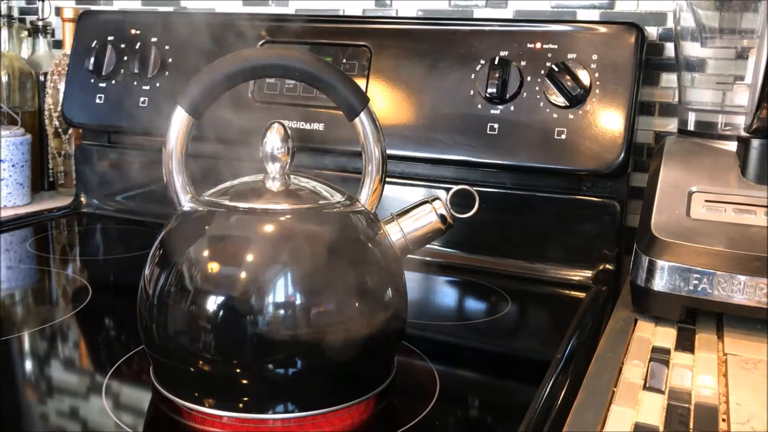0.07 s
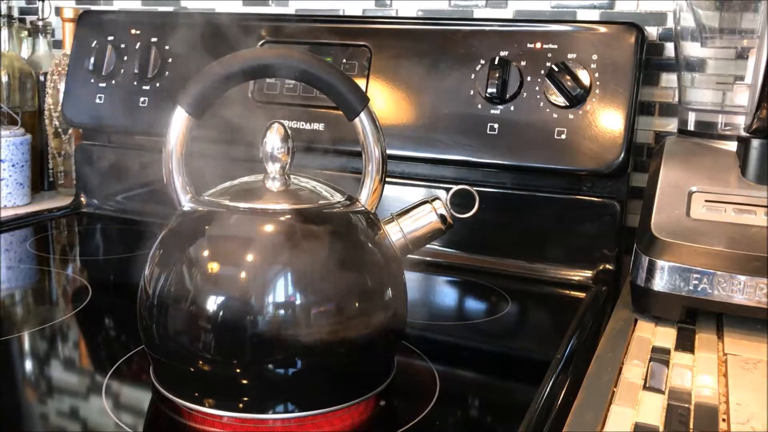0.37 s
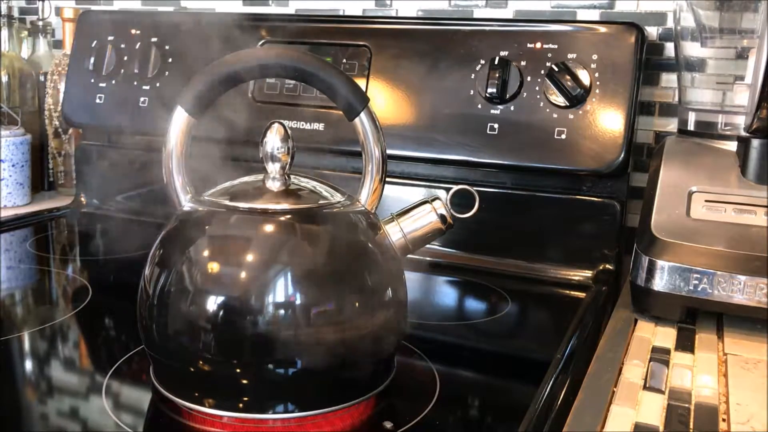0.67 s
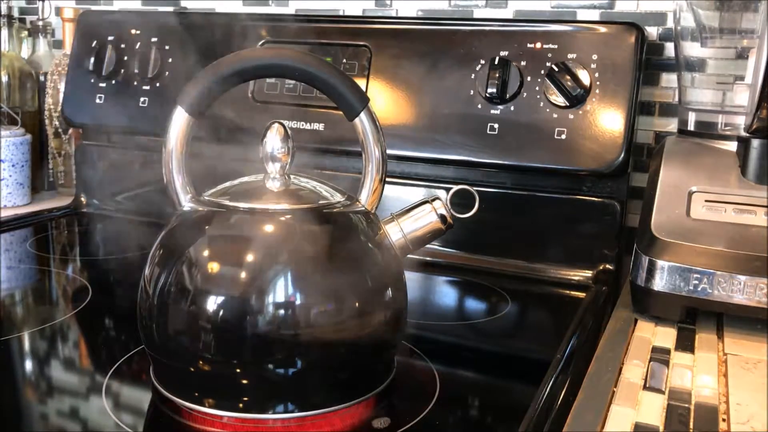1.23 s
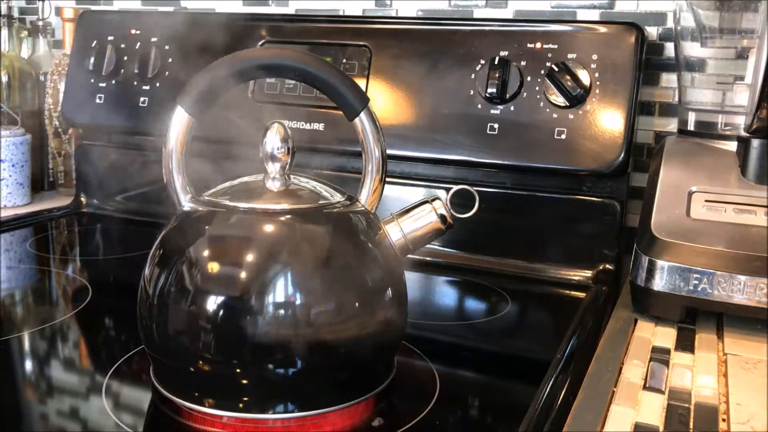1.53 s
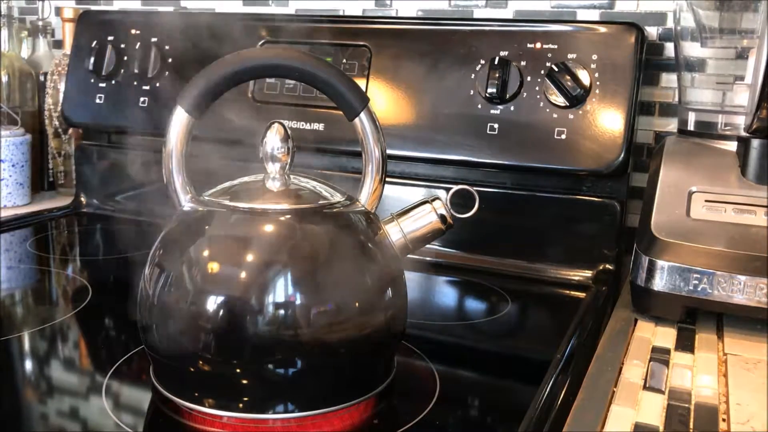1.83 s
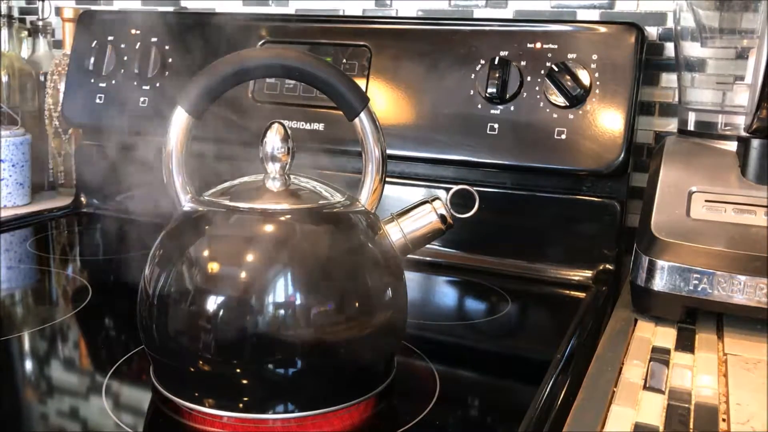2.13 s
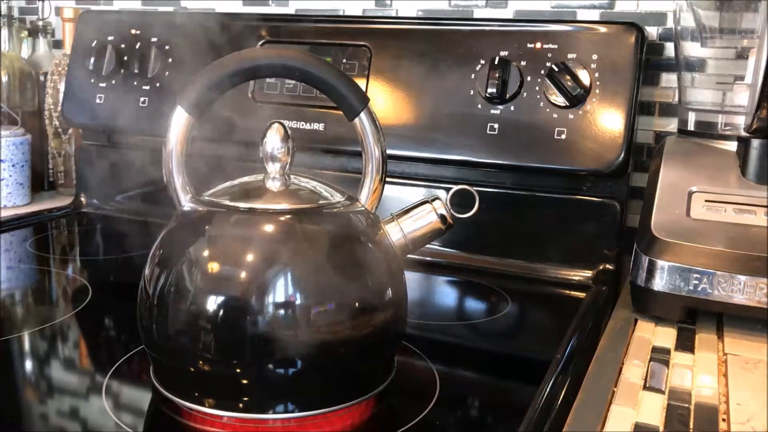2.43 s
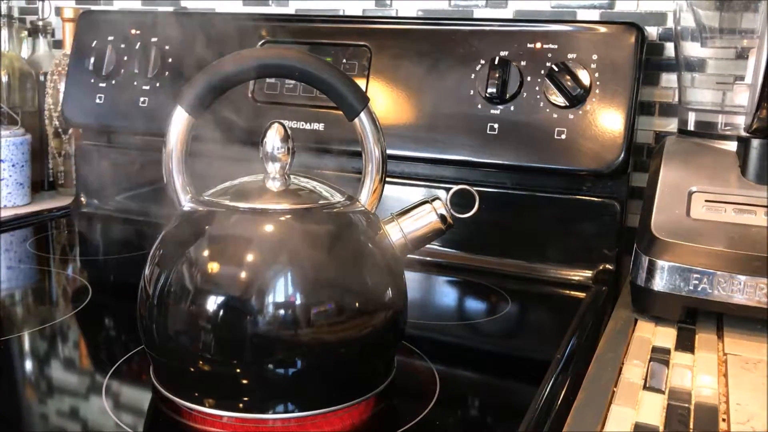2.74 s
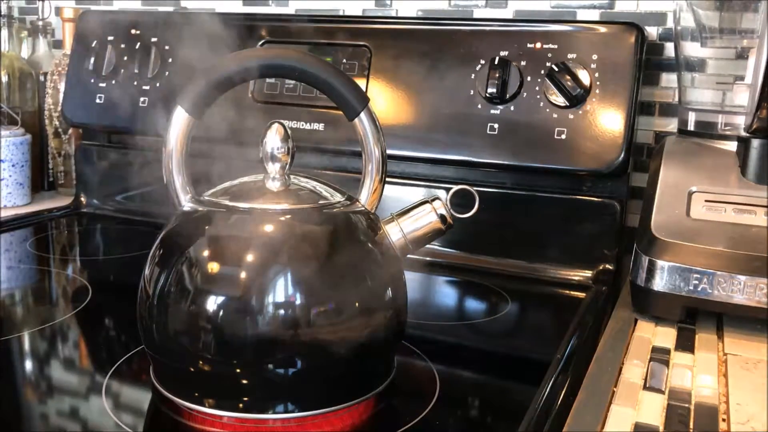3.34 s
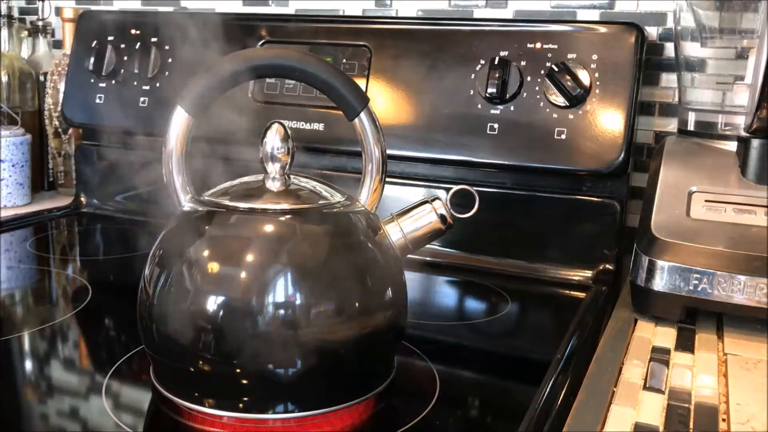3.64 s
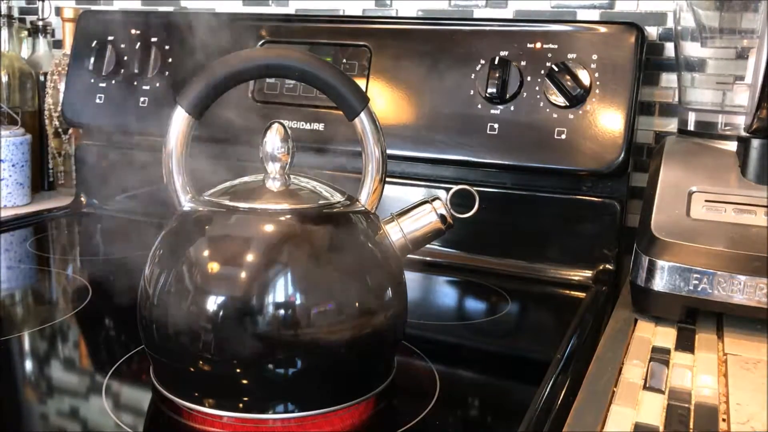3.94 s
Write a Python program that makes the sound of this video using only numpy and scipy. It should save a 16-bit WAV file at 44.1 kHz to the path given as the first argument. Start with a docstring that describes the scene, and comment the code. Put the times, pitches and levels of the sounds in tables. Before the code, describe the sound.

High, wavering kettle whistle with steam hiss, faint boiling and water briefly spitting on the burner.

```python
"""Whistling kettle on a stove

A kettle at full boil whistles in a kitchen. Its steam jet sings a shrill tone that wanders with
the pressure and flutters by interference with its own echoes. Turbulent steam hisses through the
spout over the rumble of the water; a splash sizzles away on the hot plate and single droplets pop."""
import sys
import numpy as np
from scipy import signal
from scipy.fft import rfft, irfft
from scipy.io import wavfile
from scipy.ndimage import uniform_filter1d

SR = 44100
rng = np.random.default_rng(int(sys.argv[2]) if len(sys.argv) > 2 else 0)


def transcribe(signal):
    """Save signal, clipped to [-1, 1], as a 16-bit WAV file at the path in sys.argv[1]."""
    frames = np.atleast_2d(signal).T
    limited = np.clip(frames, -1, 1)
    pcm = np.round(limited * 32767).astype(np.int16)
    wavfile.write(sys.argv[1], SR, pcm)


N = 176400
TIME = np.arange(N) / SR
RUN_IN = SR // 2   # samples in which the reverberation builds up


def from_db(db):
    """Amplitude grows tenfold for every 20 dB."""
    return 10 ** (np.asarray(db) / 20)


def rms_one(x):
    """Division by the root mean square gives unit power."""
    return x / np.sqrt(np.mean(x ** 2) + 1e-20)


def in_time(rows):
    """Linear interpolation joins (seconds, value) rows into a curve."""
    return np.interp(TIME, *np.transpose(rows))


def drift(rate_hz):
    """Low-passed noise fluctuates at unit power, mostly slower than rate_hz."""
    pole = np.exp(-2 * np.pi * rate_hz / SR)
    smooth = signal.lfilter([1], [1, -2 * pole, pole * pole], rng.standard_normal(N + SR))
    return rms_one(smooth[SR:])


def coloured(x, spectrum):
    """Spectral shaping by a (Hz, dB) curve colours a sound; the result has unit power."""
    hz, db = np.transpose(spectrum)
    bin_hz = np.maximum(np.fft.rfftfreq(N, 1 / SR), 1)
    gain = from_db(np.interp(np.log(bin_hz), np.log(hz), db))
    return rms_one(irfft(rfft(x) * gain, N))


def resonate(x, hz, width_hz):
    """A damped resonator passes a band around its natural frequency; the result has unit power."""
    radius = np.exp(-np.pi * width_hz / SR)
    feedback = [1, -2 * radius * np.cos(2 * np.pi * hz / SR), radius * radius]
    return rms_one(signal.lfilter([1, 0, -1], feedback, x))


def run_in(x):
    """Reverberation takes time to build, so a mirrored lead-in sets the room ringing beforehand."""
    return np.pad(x, (RUN_IN, 0), "reflect")


def kitchen(x, echo_db=-3, t60_s=0.39, gap_s=0.0045):
    """Diffuse reflections follow the direct sound and decay exponentially; x loses its run-in."""
    age = TIME[:RUN_IN + 1]
    response = rng.standard_normal(len(age)) * from_db(-60 * age / t60_s) * (age > gap_s)
    response *= from_db(echo_db) / np.sqrt(np.sum(response ** 2))
    response[0] += 1   # direct sound
    return signal.fftconvolve(x, response, "valid")


def echo_flutter(tone, window_s=0.045, power_floor=0.5):
    """A wavering tone interferes with its echoes; swells slower than the window are partly levelled."""
    beating = rms_one(kitchen(tone, echo_db=-1.5))
    slow_power = uniform_filter1d(beating ** 2, int(window_s * SR))
    return rms_one(beating / np.sqrt(slow_power + power_floor))


# The whistle's pitch rises with steam pressure. Each row: time in seconds, frequency in Hz.
WHISTLE_PITCH = [(0.0, 4261), (0.045, 4189), (0.11, 4295), (0.21, 4300), (0.31, 4232), (0.34, 4265),
                 (0.38, 4213), (0.41, 4276), (0.5, 4248), (0.56, 4292), (0.66, 4190), (0.685, 4294),
                 (0.8, 4310), (0.85, 4259), (0.91, 4300), (0.97, 4410), (1.08, 4350), (1.15, 4374),
                 (1.22, 4420), (1.35, 4415), (1.39, 4370), (1.44, 4410), (1.62, 4345), (1.75, 4396),
                 (1.85, 4480), (1.91, 4432), (2.0, 4561), (2.18, 4375), (2.25, 4345), (2.29, 4437),
                 (2.35, 4414), (2.49, 4472), (2.62, 4434), (2.68, 4490), (2.76, 4440), (2.81, 4431),
                 (2.87, 4320), (2.92, 4320), (2.97, 4436), (3.04, 4373), (3.13, 4460), (3.36, 4391),
                 (3.46, 4450), (3.545, 4513), (3.58, 4425), (3.66, 4420), (3.73, 4360), (3.82, 4368),
                 (3.9, 4400), (4.0, 4440)]
# The fundamental swells and fades unevenly. Each row: time in seconds, relative level in dB.
WHISTLE_LEVEL = [(0.0, -25), (0.12, -34), (0.17, -28), (0.21, -36), (0.24, -28), (0.72, -31.5), (0.78, -39),
                 (0.83, -26), (0.9, -37), (0.91, -31), (1.19, -32.5), (1.22, -21), (1.26, -32.5),
                 (1.3, -25), (1.32, -40.5), (1.35, -19), (1.37, -38.5), (1.45, -24), (1.47, -39.5),
                 (1.54, -27.5), (1.63, -33.5), (1.69, -25), (1.76, -34), (1.8, -26), (2.06, -25.5),
                 (2.07, -31), (2.12, -23.5), (2.25, -37), (2.29, -23), (2.33, -37), (2.37, -21.5),
                 (2.41, -36.5), (2.42, -22), (2.49, -32.5), (2.53, -24), (2.55, -29.5), (2.62, -22),
                 (2.71, -33.5), (2.72, -24), (2.76, -29.5), (2.81, -22.5), (2.84, -34), (2.93, -32),
                 (2.99, -23.5), (3.02, -35), (3.1, -24), (3.29, -27), (3.3, -36), (3.36, -25.5),
                 (3.39, -28.5), (3.42, -24), (3.45, -35), (3.49, -23.5), (3.51, -30.5), (3.63, -24),
                 (3.69, -30), (3.8, -28), (3.84, -41), (3.87, -23.5), (4.0, -27)]
# The overtones are faint. Each row: harmonic number, level in dB at mean pressure.
WHISTLE_OVERTONES = [(2, -56.5), (3, -87.5)]


def whistle(cavity_band_hz=(4100, 4620), offset_db=0.5, overtone_db_per_hz=0.0037):
    """Flow-excited resonance: the steam jet sings a near sine, shaken by the boil and by turbulence."""
    pitch = in_time(WHISTLE_PITCH)
    boil_wobble_hz = 15.04 * drift(28.1)
    jet_jitter_hz = 13.9 * drift(110)
    phase = 2 * np.pi * np.cumsum(run_in(pitch + boil_wobble_hz + jet_jitter_hz)) / SR
    shimmer = run_in(from_db(1.22 * drift(160)))
    cavity = signal.butter(4, cavity_band_hz, "band", fs=SR, output="sos")
    level = from_db(in_time(WHISTLE_LEVEL) + offset_db)
    tone = signal.sosfilt(cavity, level * echo_flutter(shimmer * np.sin(phase)))
    pressure_db = overtone_db_per_hz * (pitch - pitch.mean())   # overtones grow with pressure
    for harmonic, db in WHISTLE_OVERTONES:
        swell_db = 1.5 * drift(6)
        overtone = echo_flutter(shimmer * np.sin(harmonic * phase))
        tone += from_db(db + pressure_db + swell_db) * overtone
    return tone


# The jet's noise is broadband. Each row: frequency in Hz, relative spectral density in dB.
STEAM_SPECTRUM = [(60, -17.5), (200, -1), (500, -5), (900, 0.5), (1400, -1), (1900, -2.5), (3000, -3.5),
                  (4900, 1), (5700, -12), (8000, -11.5), (9300, -9.5), (10300, -19.5), (13000, -22),
                  (16000, -23.5)]
# Kettle and spout resonate. Each row: frequency in Hz, nominal width in Hz, level in dB.
SPOUT_RESONANCES = [(600, 110, -68), (990, 260, -69.5), (1410, 170, -70), (2235, 154, -59.5),
                    (2745, 165, -59.5), (3153, 60, -66.5), (3293, 55, -65), (3560, 150, -65.5),
                    (3910, 110, -58.5), (5297, 160, -61), (6700, 350, -67), (11500, 1300, -73)]


def steam(jet_db=-52, treble_db_per_hz=0.0006):
    """Turbulence radiates noise and excites kettle and spout; more pressure brightens the hiss."""
    hiss = from_db(jet_db) * coloured(rng.standard_normal(N), STEAM_SPECTRUM)
    for hz, width_hz, db in SPOUT_RESONANCES:
        swell_db = 1.86 * drift(6)
        band = resonate(rng.standard_normal(N), hz, 2 * width_hz)
        hiss += from_db(db + swell_db) * resonate(band, hz, 2 * width_hz)   # a second pass narrows it
    hiss = np.std(hiss) * rms_one(kitchen(run_in(hiss), echo_db=-8))
    pitch = in_time(WHISTLE_PITCH)
    above_whistle = signal.butter(2, pitch.mean(), "high", fs=SR, output="sos")
    treble_gain = from_db(treble_db_per_hz * (pitch - pitch.mean()))
    hiss += (treble_gain - 1) * signal.sosfiltfilt(above_whistle, hiss)
    flicker_db = 1.3 * drift(19.3)
    return hiss * from_db(flicker_db)


# The boiling water rumbles. Each row: frequency in Hz, relative spectral density in dB.
BOIL_SPECTRUM = [(20, -42), (32, -24.5), (48, -5.5), (65, 2.5), (100, 1.5), (130, 3.5), (170, -6.5),
                 (240, -10), (330, -1.5), (480, -7.5), (900, -37.5)]


def boil(level_db=-60.5):
    """The irregular motion of rolling water radiates low noise of uneven strength."""
    flicker_db = 1.2 * drift(6.2)
    return from_db(level_db + flicker_db) * coloured(rng.standard_normal(N), BOIL_SPECTRUM)


# Water spits on the hot plate.
# Each row: start in seconds, envelope scale in dB, attack and decay time constants in seconds.
SPLASH_SPITS = [(0.541, -52, 0.026, 0.03), (.735, -43.5, .025, 0.097), (0.791, -42.5, 0.005, 0.24),
                (.905, -46, 0.0033, .05), (.995, -42.5, 0.0085, 0.059), (1.079, -48, 0.0072, 0.11),
                (1.23, -46.5, 0.002, 0.034), (1.332, -45, 0.0072, 0.031), (1.44, -65, 0.0079, .25),
                (1.59, -60, .005, 0.11), (3.579, -64, 0.0034, 0.034)]
# Crackles and pops share one colour. Each row: frequency in Hz, relative spectral density in dB.
SIZZLE_SPECTRUM = [(500, -5.5), (2000, -4), (6000, -5.5), (9000, -9.5), (10500, -4.5), (12000, -2.5),
                   (15500, -1)]


def sizzle(crackles_per_s=7400, spread_db=4):
    """Rapid vaporisation bursts each spit into crackles that die away; incoherent spits add in power."""
    power = 0
    for start_s, db, attack_s, decay_s in SPLASH_SPITS:
        age = np.maximum(TIME - start_s, 0)
        envelope = from_db(db) * (1 - np.exp(-age / attack_s)) * np.exp(-age / decay_s)
        power += envelope ** 2
    sizes = from_db(spread_db * np.minimum(rng.exponential(1, N), 5))
    signs = rng.choice([-1, 1], N)
    crackles = sizes * signs * (rng.random(N) < crackles_per_s / SR)
    sputter = from_db(drift(70))   # the crackles come in clumps
    return np.sqrt(power) * sputter * coloured(kitchen(run_in(crackles)), SIZZLE_SPECTRUM)


# Single droplets burst. Each row: start in seconds, initial level in dB.
DROPLET_POPS = [(0.737, -46), (1.264, -51), (1.290, -51), (1.444, -49), (1.579, -49), (1.608, -55),
                (1.670, -53), (2.054, -54)]


def pops(decay_s=0.004):
    """A brief transient has a broad spectrum, so each bursting droplet gives a bright tick."""
    envelope = 0
    for start_s, db in DROPLET_POPS:
        age = np.maximum(TIME - start_s, 0)
        envelope += from_db(db) * (TIME >= start_s) * np.exp(-age / decay_s)
    ticks = envelope * coloured(rng.standard_normal(N), SIZZLE_SPECTRUM)
    return kitchen(run_in(ticks))


def scene():
    """By superposition, the sounds of kettle and stove add at one listening point."""
    return (whistle() + steam() + boil() + sizzle() + pops())[None]


def record(dry):
    """An elliptic low-pass filter cuts the highest treble steeply."""
    cutoff_hz = 15700
    return signal.sosfilt(signal.ellip(12, 0.1, 80, cutoff_hz, fs=SR, output="sos"), dry)


dry = scene()
out = record(dry)
transcribe(out)
```